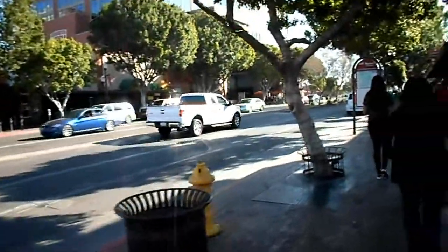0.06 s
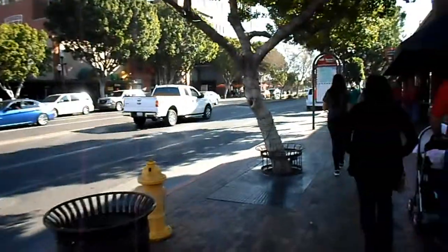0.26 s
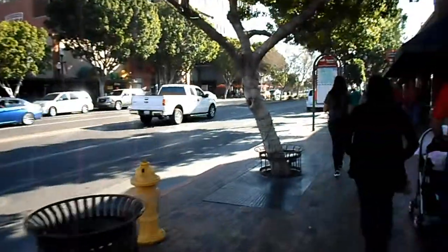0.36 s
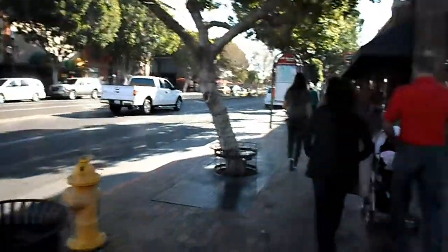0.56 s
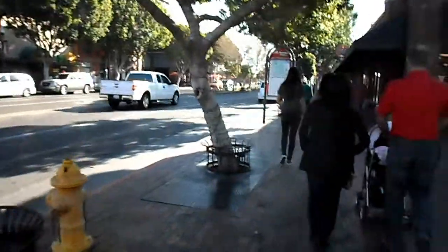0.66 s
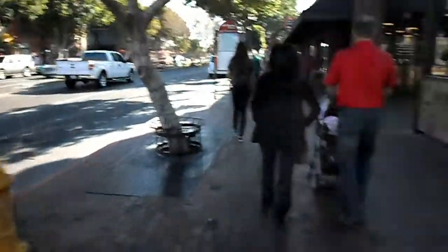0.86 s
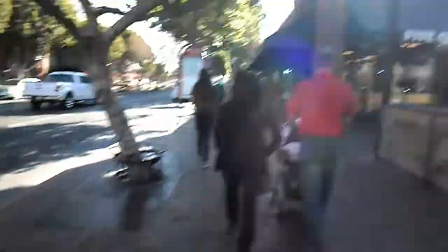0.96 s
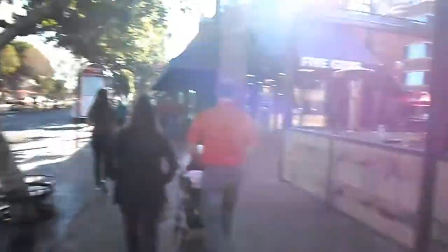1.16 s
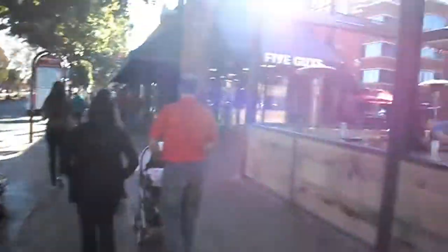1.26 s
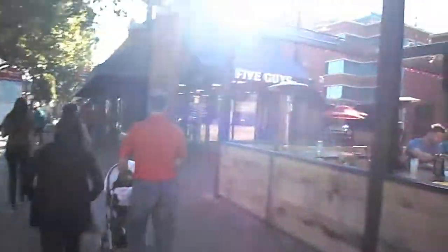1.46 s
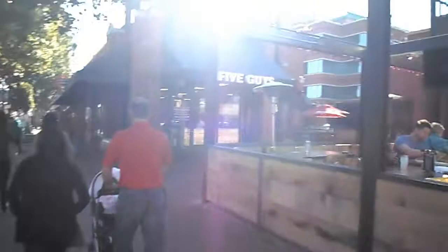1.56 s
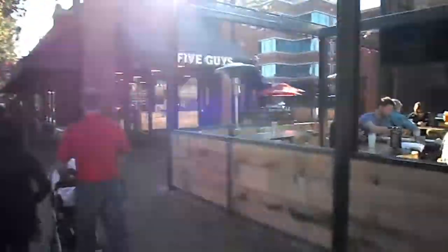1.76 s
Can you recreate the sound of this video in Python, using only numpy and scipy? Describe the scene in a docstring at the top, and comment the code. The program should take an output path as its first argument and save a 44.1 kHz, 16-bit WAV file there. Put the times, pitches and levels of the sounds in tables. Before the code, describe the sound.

Heavy low thumps shake a hand-held microphone at irregular walking steps, some with brief crackling overload; small dry clicks cluster near the end, over dull traffic rumble and growing tyre roar on a city street.

```python
"""On a city pavement, traffic passes a small recorder carried at walking pace.
Engines are low noise and wavering tones; tyre roar is coloured noise that grows overall.
Each step jolts the recorder: a deep push and pull, with shuddering noise. Small clicks are damped tones.
Rasps mark overload on the hardest jolts. The gain control ducks the street, then lets it creep back up.
Faint hiss and whine lie beneath, and timing jitter adds a thin fizz."""
import sys
import numpy as np
from scipy import signal
from scipy.fft import rfft, irfft
from scipy.io import wavfile
from scipy.ndimage import uniform_filter1d

SR = 44100
rng = np.random.default_rng(int(sys.argv[2]) if len(sys.argv) > 2 else 0)


def unload_audio(sound):
    """Save the sound as a 16-bit wav file, at the path given as the first command line argument."""
    columns = np.transpose(np.atleast_2d(sound))
    # keep every value between -1 and 1, then stretch to whole-number steps
    steps = np.round(np.clip(columns, -1, 1) * 32767)
    wavfile.write(sys.argv[1], SR, steps.astype(np.int16))


N = 79380  # length in samples
T = np.arange(N) / SR  # time of each sample, s

# All levels are those before the gain control, except the crackles, which are added after it.
# Spectra give only the colour of a noise; its loudness is set separately.

# Hiss of the recorder itself, also the colour of the random jitter: [f/Hz, level per Hz/dB]
HISS_SPECTRUM = [(100, 0.5), (2000, 2), (4200, -1), (5200, -3.5), (8000, -7), (10200, -7), (11000, -16),
                 (13300, -5.5), (16000, -21)]
HISS_DB = -62
# Thin electrical whine: [f/Hz, level/dB]
WHINE_TONES = [(3934, -71), (7866, -75), (11684, -86), (14184, -79)]
WHINE_WANDER, WHINE_WANDER_HZ = 0.00017, 39.3  # typical pitch change as a fraction, and its rate
# Regular part of the timing jitter: [f/Hz, timing error/dB relative to 1 s]
JITTER_TONES = [(3934, -109), (6530, -119), (7866, -111), (10400, -117), (11750, -117), (14184, -114),
                (15600, -119)]
JITTER_NOISE_DB = -108  # random timing error, dB relative to 1 s

# Low traffic rumble: [f/Hz, level per Hz/dB]
RUMBLE_SPECTRUM = [(8, -9), (25, -1.5), (45, 2.5), (70, -4), (100, -9.5), (155, -19), (235, -21),
                   (330, -31), (600, -43.5), (1500, -59), (16000, -100)]
RUMBLE_DB = -22
# Exhaust drone: [f/Hz, level/dB], both wavering around these values
ENGINE_TONES = [(116, -35), (230, -48.5), (380, -58)]
ENGINE_WANDER, ENGINE_WANDER_HZ = 0.025, 13  # typical pitch change as a fraction, and its rate
ENGINE_FLUTTER_DB = 2  # typical loudness change
# Tyre roar: [f/Hz, level per Hz/dB]
TYRE_SPECTRUM = [(100, -4), (300, 7.5), (500, 3), (850, 0), (1300, -6), (1600, -14), (2600, -23.5),
                 (4500, -44), (16000, -55.5)]
# Loudness of the tyre roar over time: [t/s, level/dB]
TYRE_LEVELS = [(0, -51.5), (.18, -46), (.3, -47.5), (.55, -44), (.8, -43.5), (1.15, -43.5), (1.45, -41.5),
               (1.8, -40)]
PATCHY_DB = 1  # typical swell and fade of the tyre roar's frequency bands

# Small handling ticks, level before rise and damping: [t/s, level/dB, f/Hz, width/Hz]
TICK_EVENTS = [(0.372, -47, 2066, 2500), (0.4425, -44, 5020, 3000), (0.5335, -41, 2320, 2020),
               (.791, -54, 2980, 2480), (1.138, -38, 2980, 2530), (1.364, -26.5, 4230, 600),
               (1.3668, -26.5, 2200, 800), (1.370, -29, 3600, 1100), (1.3911, -23, 1900, 1700),
               (1.4368, -27, 990, 700)]
TICK_RISE_S = 0.00014
# Overload crackles on the crests of the jolts: [t/s, length/s, level/dB]
CRACKLE_EVENTS = [(0.2074, 0.0063, -40.5), (0.2243, 0.0029, -41.5), (.228, 0.0066, -42),
                  (0.2373, 0.0017, -47), (0.4557, .0075, -41.5), (.468, 0.00269, -41), (0.8619, .0024, -39),
                  (.874, 0.0024, -41.5)]
# Colour of the crackles: [f/Hz, level per Hz/dB]
CRACKLE_SPECTRUM = [(100, -11), (700, 8.5), (1600, 0), (2500, 2), (4500, -4), (8000, -8), (12000, -16),
                    (16000, -12.5)]
# Jolts: [t/s, push level/dB, push length/s, pull level/dB, pull length/s,
#         case shudder level/dB, shudder top f/Hz]
JOLT_EVENTS = [(0.2215, 0.5, 0.0088, 7.5, 0.014, -32, 179), (0.367, -6.5, 0.0097, -1.5, 0.011, -42, 200),
               (0.451, 1.5, .014, 11, 0.015, -15, 233.7), (0.551, -1.5, 0.014, 0, 0.011, -40.5, 196),
               (0.8703, 10, 0.006, 8, 0.0087, -19, 503), (1.325, 3.5, 0.005, 3, 0.0072, -24, 215),
               (1.444, -14, 0.0066, -11, .007, -30, 293)]
# The case swings back after each pull: size relative to the pull, delay, width
REBOUND, REBOUND_S, REBOUND_WIDTH_S = 0.31, 0.046, 0.018
SHUDDER_S, SHUDDER_LAG_S = 0.012, 0.004  # width and delay of the shudder
SHUDDER_LOW_HZ, SHUDDER_KNEE_HZ = 100, 110  # its lower edge, and where it starts to dull

CEILING_DB, RECOVER_DB_PER_S, SMOOTH_S = -0.8464, 5.5, 0.0021  # gain control
EDGE_HZ = 15920  # top of the recorder's range


def amp(db):
    """Turns decibels into a gain."""
    return 10 ** (np.asarray(db) / 20)


def unit(x):
    """Scales a signal to an rms (average strength) of 1."""
    return x / np.sqrt(np.mean(x ** 2) + 1e-20)


def read(points, hz):
    """Reads a spectrum between its points, on a log-frequency axis."""
    f, value = np.transpose(points)
    return np.interp(np.log(hz + 1), np.log(f + 1), value)


def noise(spectrum):
    """Steady noise of the given colour, made by reshaping the spectrum of white noise."""
    f = np.fft.rfftfreq(N, 1 / SR)
    white = rfft(rng.standard_normal(N))
    return unit(irfft(white * amp(read(spectrum, f)), N))


def drift(hz):
    """Slow random movement: noise that weakens steeply above the given rate."""
    f = np.fft.rfftfreq(N, 1 / SR)
    slow = (f > 0) / (1 + (f / hz) ** 4)
    return unit(irfft(rfft(rng.standard_normal(N)) * slow, N))


def patchy(x, depth_db):
    """Lets groups of neighbouring frequency bands swell and fade on their own."""
    z = signal.stft(x, nperseg=1024)[2]
    field = rng.standard_normal(z.shape)
    field = uniform_filter1d(field, size=7, axis=0)  # blend across frequency
    field = uniform_filter1d(field, size=6, axis=1)  # blend across time
    changed = z * amp(depth_db * unit(field))
    return unit(signal.istft(changed, nperseg=1024)[1][:N])


def tone(hz):
    """A sine of rms 1 that follows a pitch curve, adding up its cycles sample by sample."""
    cycles = np.cumsum(hz) / SR + rng.random()
    return np.sqrt(2) * np.sin(2 * np.pi * cycles)


def electronics():
    """Steady hiss from the microphone, with a faint whine of slightly unsteady tones."""
    whine = np.zeros(N)
    for hz, db in WHINE_TONES:
        pitch = hz * (1 + WHINE_WANDER * drift(WHINE_WANDER_HZ))
        whine += amp(db) * tone(pitch)
    return amp(HISS_DB) * noise(HISS_SPECTRUM) + whine


def fizz(x):
    """Timing jitter: a small time error changes the signal in proportion to its slope."""
    error_s = amp(JITTER_NOISE_DB) * noise(HISS_SPECTRUM)
    for hz, db in JITTER_TONES:
        error_s += amp(db) * tone(np.full(N, hz))
    slope_per_s = np.gradient(x) * SR
    return error_s * slope_per_s


def traffic():
    """Low engine rumble, exhaust tones sharing one wavering speed, and tyre roar that grows overall."""
    speed = 1 + ENGINE_WANDER * drift(ENGINE_WANDER_HZ)
    drone = np.zeros(N)
    for hz, db in ENGINE_TONES:
        flutter_db = ENGINE_FLUTTER_DB * drift(ENGINE_WANDER_HZ)
        drone += amp(db + flutter_db) * tone(hz * speed)
    tyre_db = np.interp(T, *np.transpose(TYRE_LEVELS))
    tyres = amp(tyre_db) * patchy(noise(TYRE_SPECTRUM), PATCHY_DB)
    return amp(RUMBLE_DB) * noise(RUMBLE_SPECTRUM) + drone + tyres


def ticks():
    """Tiny dry clicks of the case in the hand; each is one tone that dies away very fast."""
    out = np.zeros(N)
    for s, db, hz, width_hz in TICK_EVENTS:
        t = np.maximum(T - s, 0)
        rise = 1 - np.exp(-t / TICK_RISE_S)
        decay = np.exp(-np.pi * width_hz * t)  # a wider tone dies away faster
        out += amp(db) * rise * decay * np.sin(2 * np.pi * hz * t)
    return out


def crackles():
    """Rasps of overload: coloured noise let through briefly at the listed times."""
    gate = np.zeros(N)
    for s, length, db in CRACKLE_EVENTS:
        inside_s = np.minimum(T - s, s + length - T)  # time to the nearer end
        gate += amp(db) * np.clip(inside_s * SR / 8 + 0.5, 0, 1)  # edges ramp over 8 samples
    return gate * noise(CRACKLE_SPECTRUM)


def jolts():
    """Each step pushes, then pulls on the microphone; the case shudders and swings back."""
    out = np.zeros(N)
    for s, push_db, push_s, pull_db, pull_s, shudder_db, top_hz in JOLT_EVENTS:
        t = T - s  # the push turns into the pull at t = 0
        before = t < 0
        u = t / np.where(before, push_s, pull_s)
        size = np.where(before, amp(push_db), amp(pull_db))
        out -= size * u * np.exp((1 - u ** 2) / 2)  # peaks at u = -1 and u = 1
        out += REBOUND * amp(pull_db) * np.exp(-((t - REBOUND_S) / REBOUND_WIDTH_S) ** 2)
        band = signal.butter(6, [SHUDDER_LOW_HZ, top_hz], "band", fs=SR, output="sos")
        dull = signal.butter(1, SHUDDER_KNEE_HZ, fs=SR, output="sos")
        shudder = unit(signal.sosfilt(np.vstack([band, dull]), rng.standard_normal(N)))
        swell = np.exp(-((t - SHUDDER_LAG_S) / SHUDDER_S) ** 2)
        out += amp(shudder_db) * swell * shudder
    return out


def scene():
    """Adds up the electronics, street, ticks and jolts ahead of the gain control."""
    return (electronics() + traffic() + ticks() + jolts())[None]


def record(dry):
    """Gain control ducks loud peaks and recovers slowly; then jitter, crackles and a treble limit."""
    level_db = 20 * np.log10(abs(dry[0]) + 1e-9)
    over_db = np.maximum(level_db - CEILING_DB, 0)
    recovery_db = RECOVER_DB_PER_S * T
    # Hold the deepest duck so far, letting it shrink steadily with time.
    duck_db = np.maximum.accumulate(over_db + recovery_db) - recovery_db
    smooth_db = uniform_filter1d(duck_db, max(1, round(SMOOTH_S * SR)))
    ducked = dry[0] * amp(-smooth_db)
    out = ducked + fizz(ducked) + crackles()
    treble_limit = signal.firwin(511, EDGE_HZ, window=("kaiser", 9), fs=SR)
    return signal.oaconvolve(out, treble_limit, "same")[None]


dry = scene()
out = record(dry)
unload_audio(out)
```